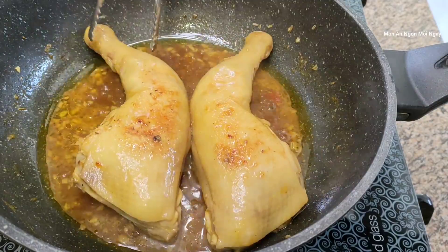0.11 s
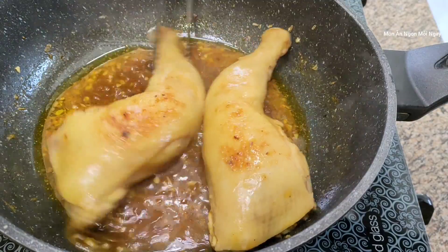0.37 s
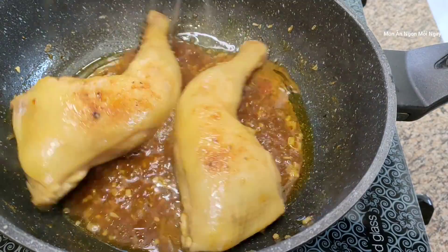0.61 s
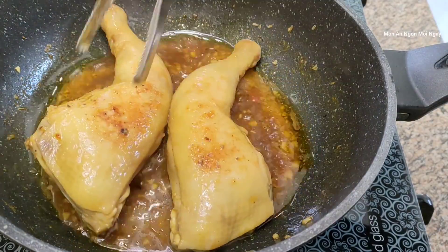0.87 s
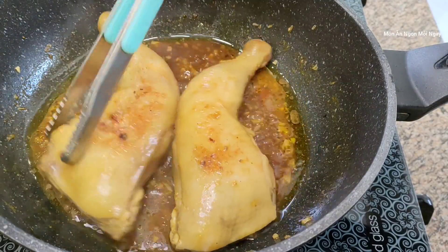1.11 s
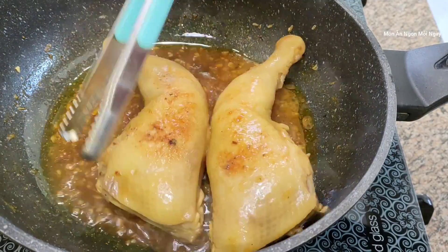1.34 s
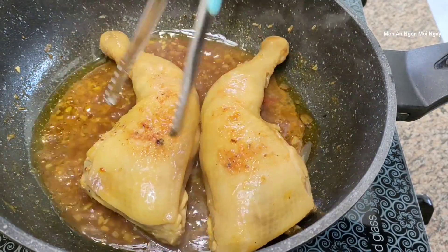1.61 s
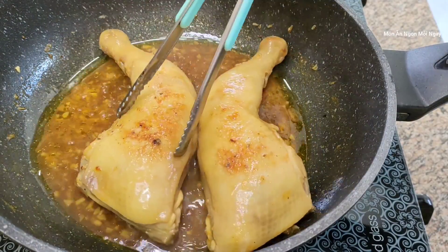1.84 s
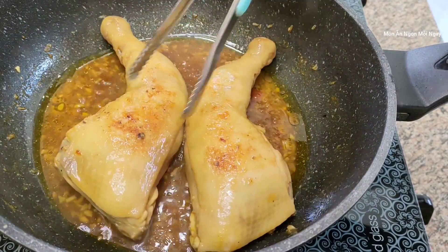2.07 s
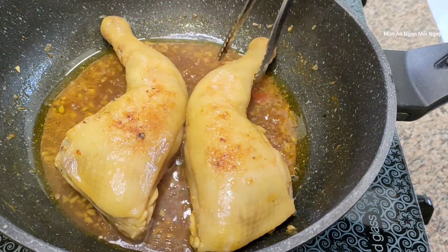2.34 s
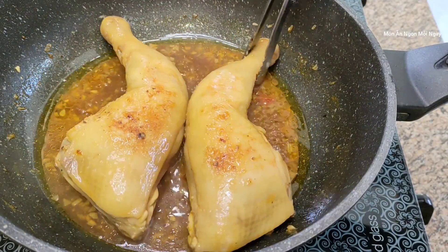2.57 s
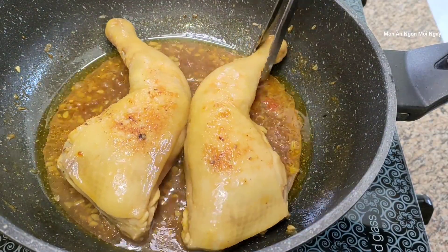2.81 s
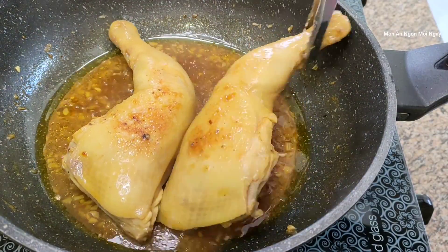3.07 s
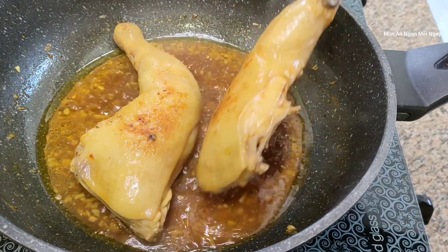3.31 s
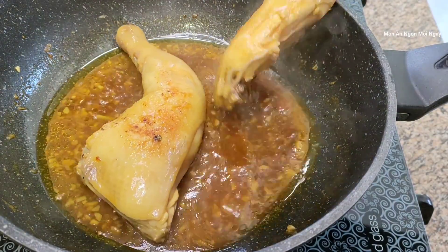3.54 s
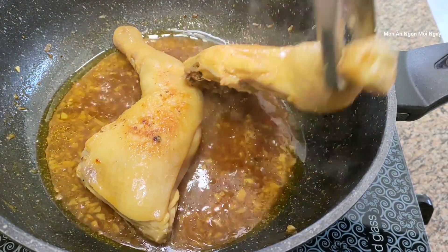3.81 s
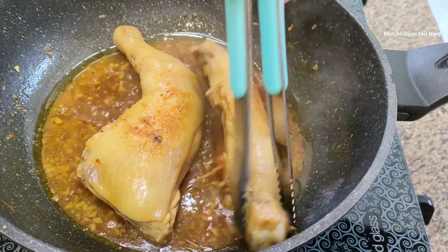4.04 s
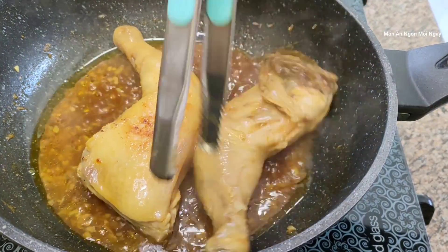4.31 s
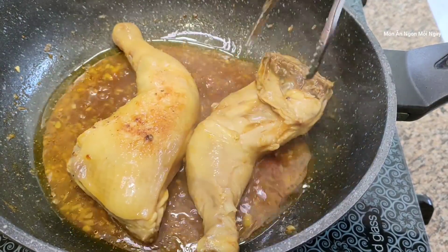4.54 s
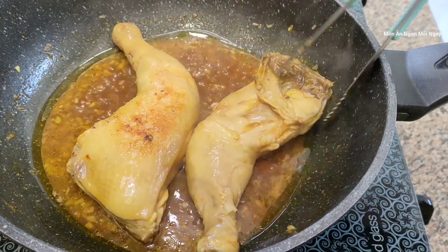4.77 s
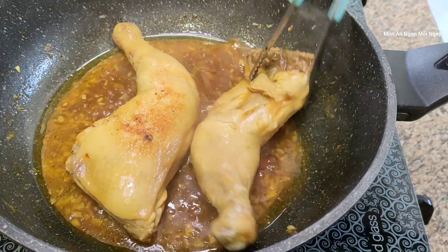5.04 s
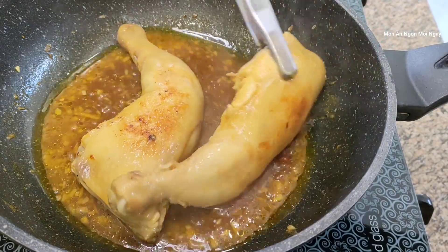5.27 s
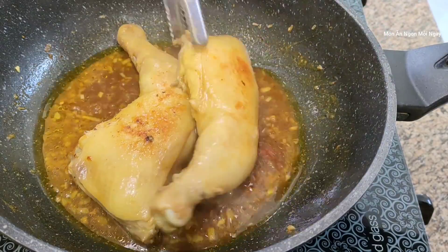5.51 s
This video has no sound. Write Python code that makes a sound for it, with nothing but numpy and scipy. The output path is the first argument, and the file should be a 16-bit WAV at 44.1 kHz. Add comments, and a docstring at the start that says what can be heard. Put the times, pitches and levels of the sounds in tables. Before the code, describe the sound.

Close up on a coated pan in a hard-walled kitchen, thick sauce fizzes gently and a fan hums low. Tongs lift and flip chicken legs, giving one firm knock, sticky smacks, short drags and bubbling gurgles, later muffled thumps, two quick bright tong clacks against the rim and a final squelchy slap, in narrow stereo.

```python
"""Tongs and meat in a simmering pan

Sauce simmers softly in a coated pan on a hob while steel tongs shift pieces of meat about: noise and clicks.
Meat and tongs knock the pan, the tongs clash and ring (damped modes); wet skin smacks (short tones with noise).
Bubbles gurgle, a thin whistle comes and goes, a fan hums as wavering noise and a tiled kitchen answers.
It is heard at two microphone ports a few centimetres apart."""
import sys
import numpy as np
from scipy import signal
from scipy.fft import rfft, irfft, next_fast_len
from scipy.io import wavfile
from scipy.ndimage import uniform_filter1d, map_coordinates

SR = 44100
rng = np.random.default_rng(int(sys.argv[2]) if len(sys.argv) > 2 else 0)


def dump(signal):
    """Clip the signal to [-1, 1] and save it as 16-bit WAV at the path in sys.argv[1]."""
    limited = np.clip(np.atleast_2d(signal).T, -1, 1)
    pcm = np.round(limited * 32767).astype(np.int16)
    wavfile.write(sys.argv[1], SR, pcm)


def rack_gain(trim_db):
    """Turn a fader trim in dB into the linear factor to multiply a signal by."""
    fader = np.asarray(trim_db, float)
    return 10 ** (fader / 20)


N = 248724

# noise likeness of the two ports: pitch_hz, likeness (0-1)
PORT_LIKENESS = [(60, 0.49), (150, 0.64), (400, 0.57), (900, 0.21), (1800, 0.15), (6000, 0.032)]
# colour of the fan and kitchen air: pitch_hz, relative_db (per Hz)
AIR_COLOUR = [(12, -27), (20, 4.5), (41, -1.5), (70, -6.5), (166, -8), (201, -2.5), (393, -17.5),
              (484, -10), (768, -9), (853, -6.5), (1300, -9), (2540, -10.5), (3000, -18.5), (3900, -49),
              (6600, -120)]
# narrow bands that sing in the air: pitch_hz, width_hz, level_db (rms, before wavering)
SINGING_BANDS = [(167.4, 36, -59), (446, 104, -58.5), (1080, 60, -62.5), (3890, 540, -56), (5580, 96, -55),
                 (5960, 73, -54.5), (6152, 68, -55.5)]
# fizz level of the sauce: time_s, level_db (rms, before wavering)
SIMMER_LEVEL = [(0, -47.5), (2.6, -48), (3.3, -46.5), (5.64, -47.5)]
# colour of the bursting froth: pitch_hz, relative_db (per Hz)
FROTH_COLOUR = [(1290, -13.5), (2200, -51), (2530, -6.5), (3040, -4), (3810, -3), (5000, -5), (5960, -4.5),
                (7090, -12), (7970, -18), (8370, -24), (8870, -18), (11600, -20), (13400, -24.5),
                (15200, -17.5), (16000, -15)]
# sauce gurgles where meat lifts or settles: start_s, length_s, level_db (largest bubble, before panning)
GURGLES_OF_SAUCE = [(1.312, .08, -48), (3.102, 0.33, -47)]
# a faint thin whistle: start_s, hold_s, relative_db, pitch_hz, sag_hz_per_s
WHISTLE_NOTES = [(.92, 0.28, -56, 3750, 620), (2.76, 0.2, -55, 3670, 60), (3.17, .07, -57, 2920, 0)]
# meat dragged over the pan floor: start_s, hold_s, level_db (before flutter)
DRAG_STROKES = [(0, 1, -58.5), (.5, 0.014, -43.5), (1.285, 0.037, -39.5), (3.12, 0.063, -45.5),
                (3.3, 0.16, -50), (4.11, 0.026, -42.5), (4.24, 0.012, -50), (4.5, 0.044, -50),
                (5.54, 0.11, -43)]
# wet smacks, single gurgles (3.2 to 3.5 s) and a few low thumps:
# start_s, relative_db, pitch_hz, t60_s, left_right_db
WET_SOUNDS = [(0.373, -30.5, 1060, 0.031, 4), (0.535, -27.5, 4060, 0.016, 24), (1.253, -33, 990, 0.03, -2),
              (1.256, -32.5, 440, 0.067, 4), (1.325, -31, 1170, .04, 5), (1.335, -32.5, 1063, 0.052, 5),
              (1.348, -32.5, 460, 0.046, 0), (1.36, -30, 1427, .05, 7), (1.35, -34, 1080, 0.056, 10),
              (1.373, -33.5, 1403, 0.073, 10), (1.421, -29.5, 1190, 0.032, 5.5),
              (3.185, -41, 458, 0.096, 0), (3.2, -34.5, 171, .1, 0), (3.293, -30, 477, 0.078, -3),
              (3.338, -33.5, 465, 0.13, -5), (3.345, -35, 1100, 0.073, -1), (3.475, -34, 472, 0.061, -5),
              (3.518, -33.5, 1080, 0.046, 2), (0.598, -32, 120, 0.044, -4), (4.127, -22, 83, 0.02, -26),
              (4.401, -18.5, 440, 0.034, 8), (5.243, -30, 3180, 0.056, -20), (5.538, -34, 1080, 0.033, 19),
              (5.547, -28, 1080, 0.05, 10), (5.559, -20.5, 1050, 0.034, 11),
              (5.573, -16.5, 1080, 0.014, -3)]
# dry, broad ticks of the tong tips: start_s, relative_db, centre_hz, t60_s, left_right_db
TONG_TICKS = [(0.588, -19, 8700, .004, 8), (0.597, -15.5, 5390, 0.043, 1.5), (1.2969, -11, 2590, 0.02, 3),
              (1.2994, -17, 2660, 0.013, 11), (1.302, -21, 2250, 0.028, 2), (1.307, -21, 2000, 0.012, 5),
              (3.121, -30.5, 2000, 0.014, 10), (4.194, -38, 7900, 0.086, 1), (4.2457, -22, 1270, 0.017, 5),
              (4.246, -16, 2870, .014, 2), (4.2453, -23.5, 5400, 0.012, 1), (4.277, -28, 1500, 0.008, -7.5)]
# modes of the pan: pitch_hz, relative_db, t60_s (ringing freely)
PAN_MODES = [(110, -14, .15), (172, -14, .15), (215, -9, .2), (238, -5, .2), (336, -14, .15),
             (409, -12, .25), (445, -7, .12), (490, -13, .22), (565, -13, .2), (711, -11, .25),
             (781, -12, .15), (870, -1, .13), (900, -3, .13), (955, -6, .15), (1028, -7, .18),
             (1125, -15, .12), (1240, -14, .18), (1464, -14, .15), (1520, -12, .08), (1590, -8, .1),
             (1815, -6, .14), (1965, -13, .1), (2067, -11, .07), (2770, -14, .08)]
# modes of the tongs: pitch_hz, relative_db, t60_s (ringing freely)
TONG_MODES = [(2218, -17, .12), (2282, -11, .2), (2420, -14, .15), (2541, -12, .2), (2700, -15, .15),
              (2885, -14, .05), (3214, -9, .2), (3380, -13, .1), (3546, -7, .25), (3700, -7, .1),
              (3770, -9, .1), (3900, -8, .1), (4080, -9, .08), (4200, -14, .1), (4360, -12, .2),
              (4598, -6, .2), (4790, -7, .14), (4820, -3, .14), (5040, -10, .12), (5126, -5, .12),
              (5610, -4, .2), (5650, -4, .2), (6103, -7, .15), (6874, -18, .1), (7130, -16, .35),
              (7725, -17, .3), (8220, -21, .35), (9030, -22, .3), (9590, -23, .3), (10340, -23, .3),
              (11320, -22, .22), (12400, -24, .2)]
# meat knocks the pan, feeding one band of modes, most the one under the blow:
# start_s, relative_db, lowest_hz, highest_hz, favoured_hz
PAN_KNOCKS = [(0.594, -32, 503, 2050, 910), (.598, -6.5, 308, 2940, 452), (.6105, -19, 403, 1500, 900),
              (.635, -16.5, 333, 2300, 450), (4.101, -25.5, 150, 1800, 243), (4.116, -24, 133, 1090, 497),
              (4.3873, -15.5, 400, 1270, 1190), (4.393, -16, 152, 900, 245), (4.504, -30, 196, 590, 444),
              (4.915, -29, 148, 486, 210), (5.018, -22, 152, 3520, 250)]
# the tongs clash on the rim: start_s, tongs_relative_db, pan_relative_db, ring_share (0-1 of t60), favoured_hz
RIM_CLASHES = [(4.898, -10, -29.5, 0.33, 5170), (4.902, -14, -12.5, 0.44, 6000),
               (4.915, -20, -20.5, 0.92, 3270), (4.966, -12, -29, 0.26, 3780),
               (4.970, -18.5, -14.5, 0.55, 1810), (4.984, -35, -23.5, 1, 900)]
# how long the kitchen answers: pitch_hz, t60_s
KITCHEN_DECAY = [(150, 0.97), (800, 0.89), (2000, 1), (4000, 0.9), (7000, 0.97), (11000, 0.94),
                 (15000, 0.72)]


def unit(x):
    """Scaled to rms 1."""
    return x / np.sqrt(np.mean(x ** 2) + 1e-20)


def along(points, hz):
    """Reads (Hz, value) points on a log pitch axis."""
    f, v = np.transpose(points)
    return np.interp(np.log(hz + 1), np.log(f + 1), v)


def curve(rows):
    """Joins (time, value) points by straight lines, one value per sample."""
    return np.interp(np.arange(N) / SR, *np.transpose(rows))


def wobble(rate):
    """A smooth random curve, rate knots a second."""
    knots = rng.standard_normal(int(N * rate / SR) + 4)
    return map_coordinates(knots, [np.arange(N) * rate / SR])


def held(rows, rise_db_per_s, fall_db_per_s):
    """Gain of events that rise up to their start, hold and fall, straight in dB."""
    s, hold, db = np.array(rows).T[:, :, None]
    t = np.arange(N) / SR
    rise_db = rise_db_per_s * np.maximum(s - t, 0)
    fall_db = fall_db_per_s * np.maximum(t - s - hold, 0)
    return rack_gain(db - rise_db - fall_db).sum(axis=0)


def filtered(x, response):
    """x through a complex response of frequency."""
    m = next_fast_len(x.shape[-1] + 8192)
    return irfft(rfft(x, m) * response(np.fft.rfftfreq(m, 1 / SR)), m)[..., :x.shape[-1]]


def peak(hz, centre, width):
    """One resonance, gain 1 at its centre."""
    return 1j * hz * width / (centre ** 2 - hz ** 2 + 1j * hz * width)


def spread(pair, gain):
    """Two unrelated signals as a stereo pair of rms 1: more alike in the bass than in the treble."""
    turn = lambda hz: np.arccos(np.clip(along(PORT_LIKENESS, hz), 0, 1)) / 2
    mid, side = filtered(pair, lambda hz: gain(hz) * [np.cos(turn(hz)), np.sin(turn(hz))])
    return unit(np.array([mid + side, mid - side]))


def rush(patchy_db, size):
    """Two noises with shared patches of random gain, size = (bins, frames)."""
    z = signal.stft(rng.standard_normal((2, N)), nperseg=512)[2]
    field = rng.standard_normal(z.shape[1:])
    field = uniform_filter1d(field, size=size[0], axis=0)
    field = uniform_filter1d(field, size=size[1], axis=1)
    return unit(signal.istft(z * rack_gain(patchy_db * unit(field)), nperseg=512)[1][:, :N])


def crackle(per_s, uneven_db):
    """Two trains of sparse clicks of scattered size."""
    size = rack_gain(uneven_db * rng.exponential(size=(2, N))) * rng.standard_normal((2, N))
    return unit(size * (rng.random((2, N)) < per_s / SR))


def burst(t, t60, shared):
    """A dying noise, partly the same at both ports."""
    noise = rng.standard_normal((3, len(t)))
    return rack_gain(-60 * t / t60) * (shared * noise[0] + (1 - shared) * noise[1:])


def through(modes, blur):
    """The colour a body gives a short noise: its modes, each widened to blur times its pitch."""
    return lambda f: sum((-1) ** k * rack_gain(0.096 * db) * peak(f, hz, blur * hz)
                         for k, (hz, db, _) in enumerate(modes))


def air():
    """Fan and kitchen air: patchy coloured noise, with a few narrow bands that waver."""
    level_db = -48 + .8 * wobble(3)
    bed = rack_gain(level_db) * spread(rush(patchy_db=2.0, size=(4, 12)), lambda hz: rack_gain(along(AIR_COLOUR, hz)))
    for hz, width, db in SINGING_BANDS:
        gain = rack_gain(db + 1.15 * wobble(5.026))
        bed = bed + gain * spread(rng.standard_normal((2, N)), lambda f: peak(f, hz, width) ** 2)
    return bed


def sauce():
    """Froth: dense tiny clicks on an unevenly patchy hiss."""
    froth = rush(patchy_db=4.5, size=(2, 12)) + 0.18 * crackle(per_s=2700, uneven_db=4.0)
    level_db = curve(SIMMER_LEVEL) + 0.057 * wobble(11.0)
    return rack_gain(level_db) * spread(froth, lambda hz: rack_gain(along(FROTH_COLOUR, hz)))


def gurgle():
    """Bubbles: soft-starting damped tones whose pitch rises, scattered in time and leaning left."""
    middle_hz, log_spread = 900, 0.408
    life_cycles, rise_per_life = 5.9, 0.22
    bubbles_per_s = 120
    out, t = np.zeros((2, N + SR)), np.arange(SR // 10) / SR
    for start, length, db in GURGLES_OF_SAUCE:
        count = int(bubbles_per_s * np.ceil(10 * length) / 10)  # length rounded up to a tenth of a second
        for when, pitch, size, side in rng.random((count, 4)):
            hz = middle_hz * np.exp(log_spread * (4 * pitch - 2))
            lives = t * hz / life_cycles
            envelope = np.e * 3 * lives * np.exp(-3 * lives)  # reaches 1 at a third of the life
            tone = envelope * np.sin(2 * np.pi * hz * t * (1 + rise_per_life * lives / 2))
            port_db = (4.3 * side + 1.0) * np.array([[1], [-1]])
            at = round((start + when * length) * SR)
            out[:, at:][:, :len(t)] += rack_gain(db - 23.0 * size + port_db) * tone
    return out[:, :N]


def whistle():
    """A slightly blurred tone that may sag in pitch, perhaps steam through a gap under the meat."""
    fade_db_per_s = 450
    blur_knots_per_s, blur_rad = 45, .7
    t, out = np.arange(N) / SR, np.zeros(N)
    for s, hold, db, hz, sag_hz_per_s in WHISTLE_NOTES:
        cycles = hz * (t - s) - sag_hz_per_s * (t - s) ** 2 / 2
        phase = 2 * np.pi * cycles + blur_rad * wobble(blur_knots_per_s)
        gain = held([(s, hold, db + 2.5)], fade_db_per_s, fade_db_per_s)
        out += gain * rack_gain(2 * wobble(24.95)) * np.sin(phase)
    return out


def drag():
    """Wet friction: grainy noise that wakes the damped modes of the pan."""
    def body(f):
        modes = sum(rack_gain(0.2 * db) * peak(f, hz, 0.13 * hz) for hz, db, _ in PAN_MODES)
        return 1.7 / (1 + (f / 2500) ** 4) + modes

    rub = rng.standard_normal((2, N)) + 0.64 * crackle(per_s=530, uneven_db=2.0)
    flutter_db = 1.8 * wobble(30)
    strokes = held(DRAG_STROKES, rise_db_per_s=143, fall_db_per_s=121)
    return strokes * rack_gain(flutter_db) * spread(rub, body)


def smacks_and_ticks():
    """Wet sounds and ticks: a short damped tone with a spit of noise; the wider the spread, the less tone."""
    wet_spread, tick_spread = 0.81, 0.99  # noise width over pitch
    events = [(*r, wet_spread) for r in WET_SOUNDS] + [(*r, tick_spread) for r in TONG_TICKS]
    out, t = np.zeros((2, N + SR)), np.arange(SR // 10) / SR
    for s, db, hz, t60, left_right_db, wide in events:
        spit = unit(filtered(burst(t, np.inf, shared=0.12), lambda f: peak(f, hz, wide * hz)))
        sound = np.sin(2 * np.pi * hz * t) / (1 + wide ** 2) + .55 * spit
        port_db = left_right_db / 2 * np.array([[1], [-1]])
        sound = sound * rack_gain(db - 60 * t / t60 + port_db)
        out[:, round(s * SR):][:, :len(t)] += filtered(sound, lambda f: peak(f, hz, 0.85 * wide * hz) ** 2)
    return out[:, :N]


def ring(modes, t, share, rough):
    """One strike: modes at new strengths, wavering as the piece rattles; high ones differ in phase by port."""
    scatter_db = 1.5
    hz, db, t60 = np.array(modes).T[:, :, None]
    chance = rng.standard_normal((2, len(modes), 1))
    apart = np.arccos(np.clip(along(PORT_LIKENESS, hz) + 0.38, 0, 1)) / 2 * chance[0]
    knots = rng.standard_normal((len(modes), 40))
    drift = np.array([np.interp(t * 80, np.arange(40), k - k[0]) for k in knots])  # 80 knots a second
    level_db = db + scatter_db * chance[1] + 1.55 * rough * drift[::-1] - 60 * t / (share * t60)
    fade = rack_gain(level_db) * (1 - np.exp(-t / 0.00021))
    phase = 2 * np.pi * hz * t + rough * drift
    return np.array([np.sum(fade * np.sin(phase + side * apart), axis=0) for side in (1, -1)])


def blows():
    """Each blow rings the pan, a clash the tongs too, and cracks; soft ones lose treble, light ones bass."""
    free_hz = 223  # a knock that reaches this low rings freely, a higher one shorter
    clash_low_hz, clash_high_hz = 185, 10700
    favour, favour_width = 1.5, 0.08  # extra gain at the favoured pitch; width over pitch
    knocks = [(s, db, -np.inf, low, high, favoured, min(1, free_hz / low))
              for s, db, low, high, favoured in PAN_KNOCKS]
    clashes = [(s, pan, tongs, clash_low_hz, clash_high_hz, favoured, share)
               for s, tongs, pan, share, favoured in RIM_CLASHES]
    out, t = np.zeros((2, N + SR)), np.arange(SR // 2) / SR
    for s, pan_db, tongs_db, low_hz, high_hz, favoured_hz, share in knocks + clashes:
        def band(f):
            contact = peak(f, np.sqrt(low_hz * high_hz), high_hz - low_hz) ** 3
            return contact * (1 + favour * peak(f, favoured_hz, favour_width * favoured_hz))

        thud = 4.5 * filtered(burst(t, .09 * share, shared=1.0), through(PAN_MODES, blur=0.12))
        crack = 2.3 * filtered(burst(t, 0.054 * share, shared=0.45), through(TONG_MODES, blur=0.037))
        crack = crack + 1.14 * burst(t, 0.025, shared=0.17)
        pan = rack_gain(pan_db - 5.5) * (1.133 * ring(PAN_MODES, t, share, rough=.65) + thud)
        tongs = rack_gain(tongs_db + 6.5) * (0.8 * ring(TONG_MODES, t, share, rough=0.38) + crack)
        out[:, round(s * SR):][:, :len(t)] += filtered(pan + tongs, band)
    return out[:, :N] * rack_gain([[.9], [-.9]])  # leans slightly left


def kitchen(x):
    """The walls answer after a few ms; each frequency dies at its own speed."""
    top_hz = 9200  # the walls and the air swallow the treble above this
    hz, t, z = signal.stft(rng.standard_normal((2, SR * 3 // 4)), SR, nperseg=256)
    tail = signal.istft(z * rack_gain(-60 * t / along(KITCHEN_DECAY, hz)[:, None]), SR, nperseg=256)[1]
    tail = tail / np.linalg.norm(tail[0])
    x = filtered(x, lambda f: 1 / (1 + 1j * f / top_hz) ** 2)
    delayed = np.pad(x, ((0, 0), (200, 0)))
    return signal.fftconvolve(delayed, tail, axes=1)[:, :N]


def scene():
    """All sources at the two ports: the left hears first, but the whistle reaches both at once."""
    lead_s = 0.00013
    loud, small = blows(), smacks_and_ticks() + gurgle()
    answer = kitchen(rack_gain(-8.5) * loud + rack_gain(-10.0) * small)
    steady = (drag() + sauce() + air()) * rack_gain([[.4], [-.4]])  # leans slightly left
    near = loud + small + answer + steady
    ports = np.array([[1], [-1]])
    return filtered(near, lambda hz: np.exp(1j * np.pi * hz * lead_s * ports)) + whistle()


def band_limit(x):
    """A steep low-pass at the top of the band."""
    return signal.sosfilt(signal.butter(12, 16330, fs=SR, output="sos"), x)


def record(dry):
    """Clips the mix at full scale."""
    mix = np.clip(dry, -1, 1)
    return band_limit(mix)


dry = scene()
out = record(dry)
dump(out)
```